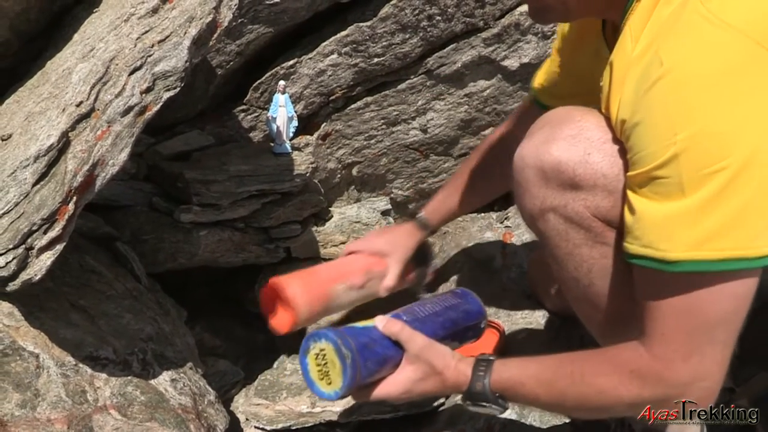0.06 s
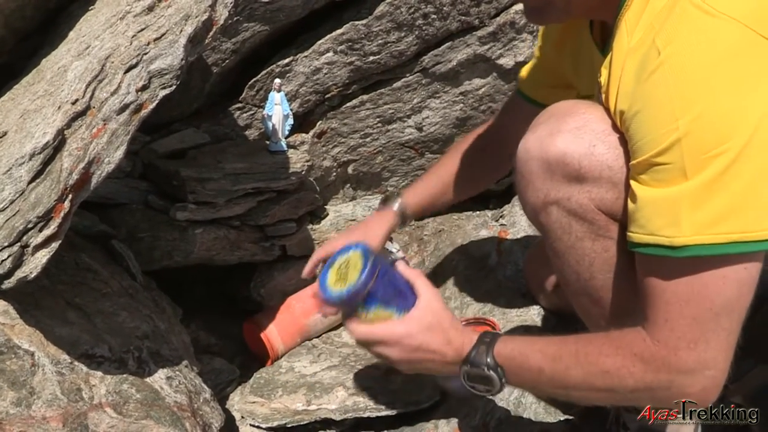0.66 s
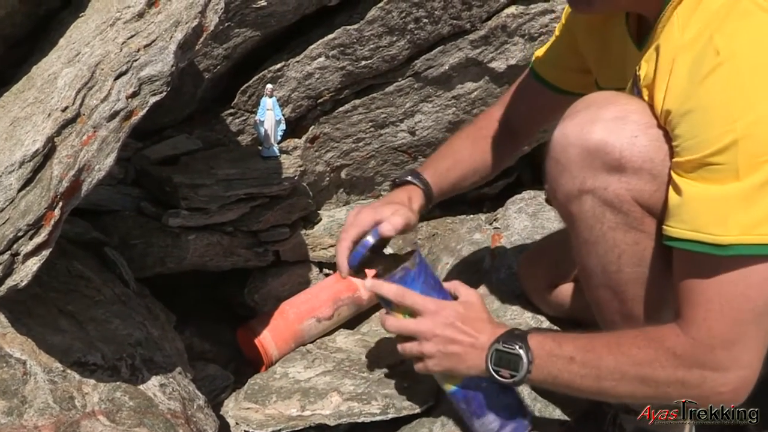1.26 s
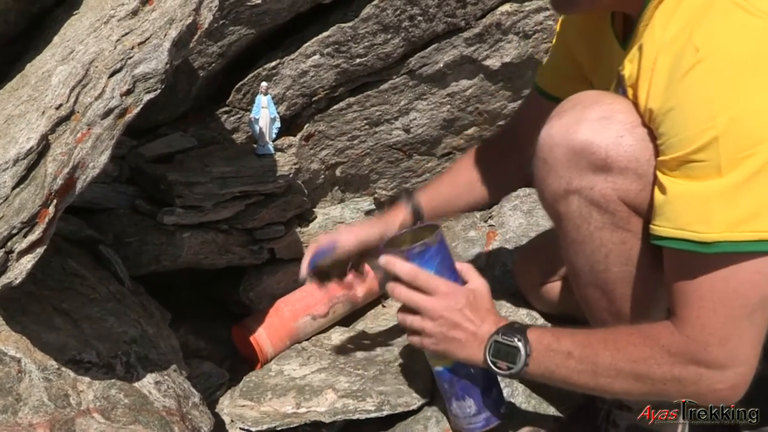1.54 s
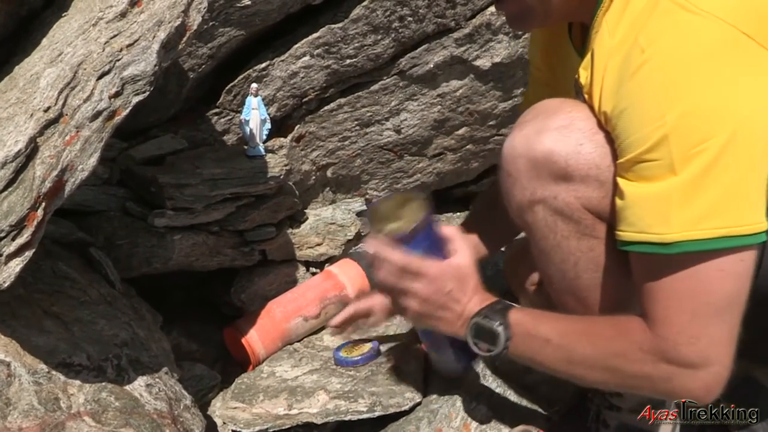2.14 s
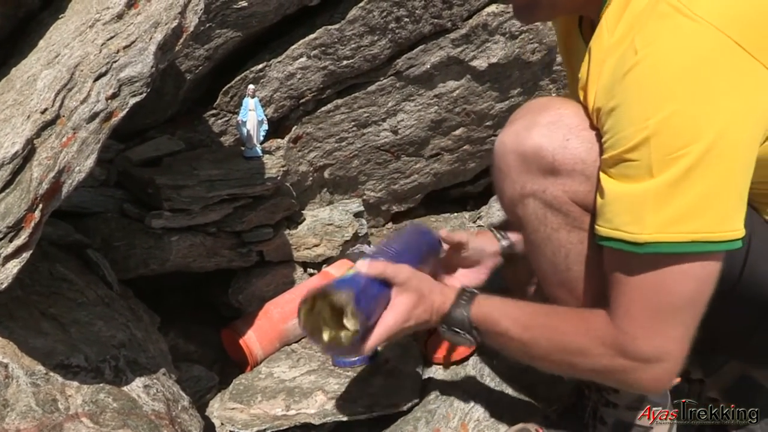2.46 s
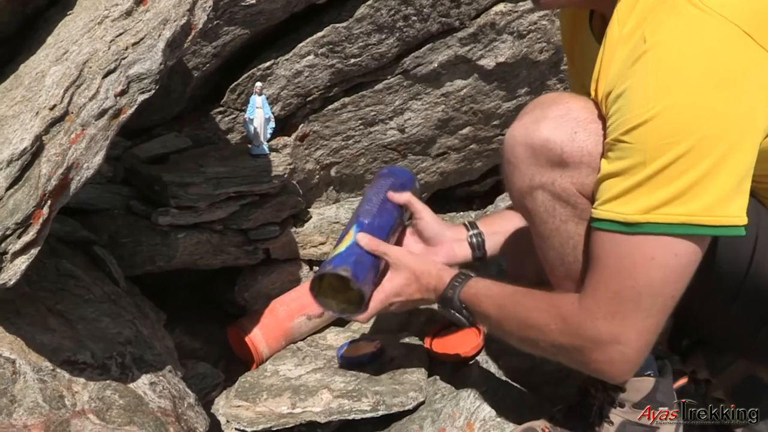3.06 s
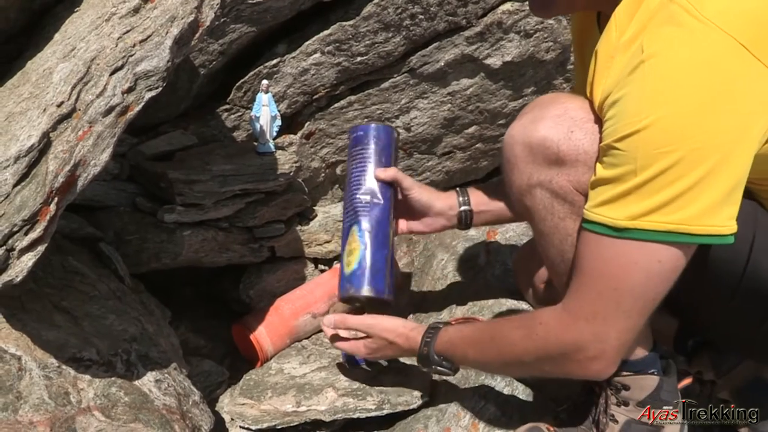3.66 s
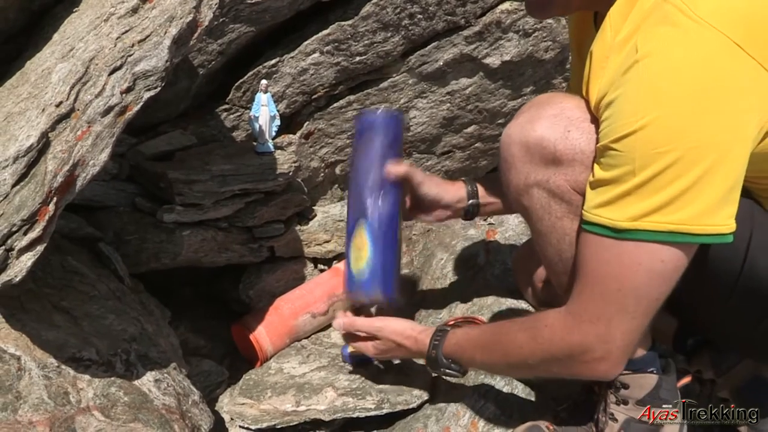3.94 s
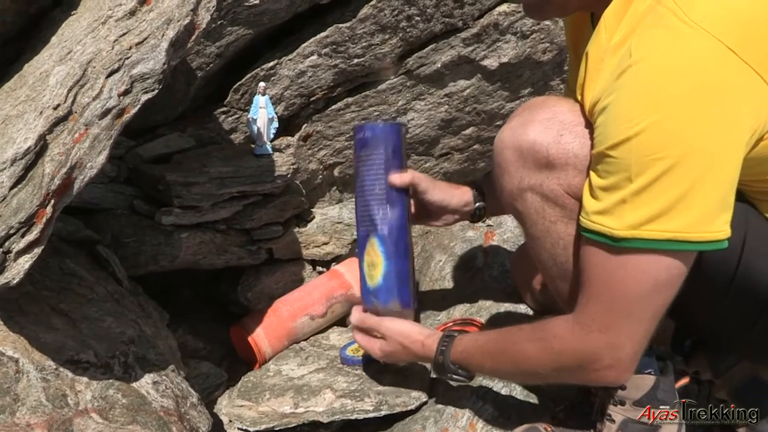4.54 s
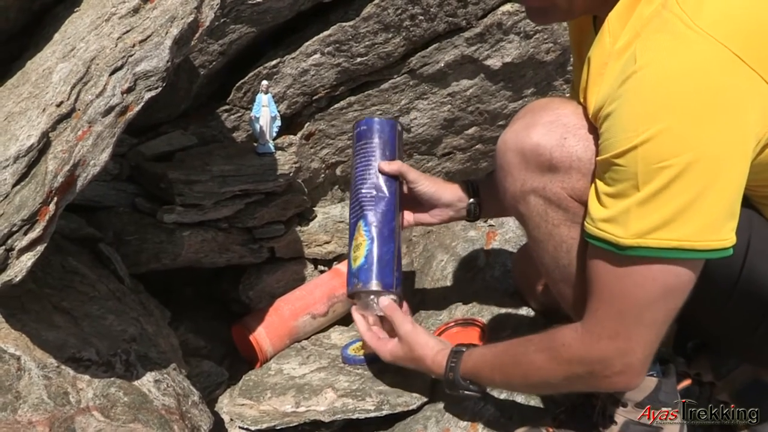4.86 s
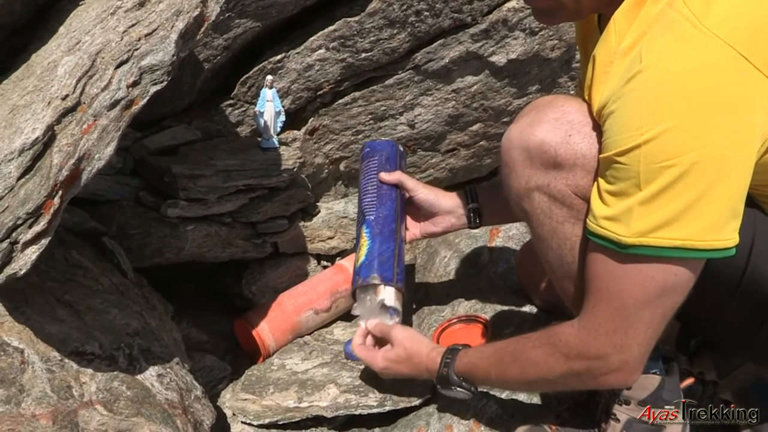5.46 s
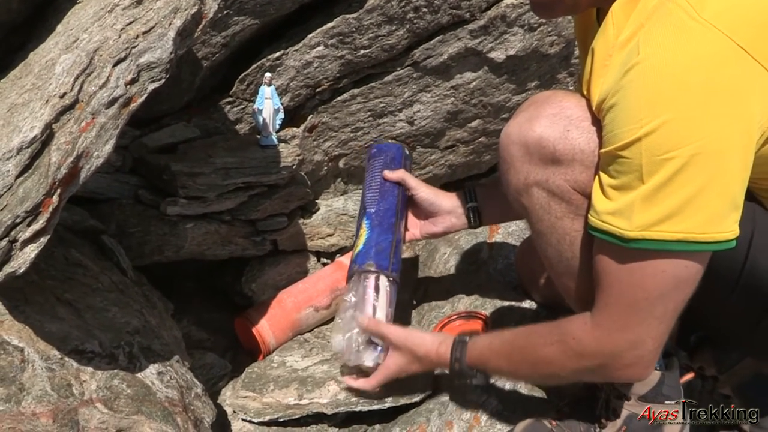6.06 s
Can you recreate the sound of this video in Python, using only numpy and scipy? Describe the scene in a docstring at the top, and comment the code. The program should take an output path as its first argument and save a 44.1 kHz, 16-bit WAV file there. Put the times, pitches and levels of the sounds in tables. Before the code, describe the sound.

A hollow plastic clack, a tin tube clanging and a metal lid dropping, then plastic scraping and ticking out of the tube in light wind.

```python
"""In a quiet rocky niche a man lays down a plastic flask with a hollow clack. His palms brush over things
and light gusts start to buffet the microphone. He scrapes the lid off a tin tube, stands the tube on the
rock with a clang and drops the ringing metal lid. Then he eases a plastic container out of the tube:
it catches, slips, scrapes and ticks. Throughout, a noise suppressor mutes whatever is faint."""
import sys
import numpy as np
from scipy import signal
from scipy.fft import irfft, next_fast_len
from scipy.io import wavfile
from scipy.ndimage import uniform_filter1d

SR = 44100
rng = np.random.default_rng(int(sys.argv[2]) if len(sys.argv) > 2 else 0)


def dump(signal):
    """Clip the signal to [-1, 1] and save it as 16-bit WAV at the path in sys.argv[1]."""
    limited = np.clip(np.atleast_2d(signal).T, -1, 1)
    pcm = np.round(limited * 32767).astype(np.int16)
    wavfile.write(sys.argv[1], SR, pcm)


N = 277915
TOP_HZ = 16100

# The tin tube's modes. Each row: pitch in Hz, level in dB, time to fall 60 dB in seconds.
TIN_MODES = [(271, 2, .19), (392, -5, .28), (417, -6, .22), (631, -5, .17), (762, -3, .14), (797, -9, .33),
             (913, -11, .15), (1032, -5, .19), (1257, -10, .14), (1366, 2, .17), (1690, -29, .45),
             (2003, -14, .2), (2670, -9, .11), (4635, -19, .11)]
# The tone of a rubbed wall. Each row: frequency in Hz, level in dB.
WALL_TONE = [(120, -25), (270, -4), (540, -15.5), (720, -0.5), (1050, -9), (3100, -3), (5300, -4),
             (8200, -12.5), (16000, -17)]
# Pulls that ease the container along. Each row: start and length in seconds, level in dB,
# swell from start to end in dB, tilt in dB per octave.
PULLS = [(3.764, 0.098, -49, -7.5, -5), (3.909, 0.12, -46.5, -13.5, -2), (4.04, 0.053, -36.5, 15.5, -2.5),
         (4.11, .21, -42, 7.5, -3.5), (4.313, 0.233, -35.5, 2, -2.5), (4.539, 0.13, -42.5, -13.5, -2.5),
         (4.734, 0.16, -45.5, 3, -5.5), (4.982, 0.16, -38.5, -5.5, -0.5), (5.123, 0.103, -26, 4.5, 1),
         (5.223, 0.334, -40, 17.5, -1.5), (5.599, 0.073, -25, -1.5, -1.5), (5.69, 0.081, -38.5, -19.5, -2),
         (5.77, 0.155, -36, 5.5, -2), (5.933, 0.093, -43.5, 1, -1.5), (6.08, 0.14, -51.5, 4, -2),
         (6.227, .076, -42, -13, -0.5)]


def amp(db):
    """Decibels to gain."""
    return 10 ** (np.asarray(db) / 20)


def unit(x):
    """Scales to rms 1."""
    return x / np.sqrt(np.mean(x ** 2) + 1e-20)


def read(points, hz):
    """Reads a table along a log-frequency axis."""
    f, value = np.transpose(points)
    return np.interp(np.log(hz + 1), np.log(f + 1), value)


def add(mix, s, sound):
    """Mixes a sound in at s seconds."""
    part = mix[round(s * SR):][:len(sound)]
    part += sound[:len(part)]


def swell(t, rise, length, fall):
    """A soft rise, a hold until `length`, an exponential fall."""
    return np.sin(np.pi / 2 * np.minimum(t / rise, 1)) ** 2 * np.exp(-np.maximum(t - length, 0) / fall)


def shaped(x, envelope):
    """Lays an envelope on a sound, which then has the envelope's power."""
    return unit(x * envelope) * np.sqrt(np.mean(envelope ** 2))


def spectra(x, size):
    """Short-time spectra: frequencies, times, bins."""
    return signal.stft(x, SR, nperseg=size, noverlap=size * 3 // 4)


def waveform(z, size):
    """Back from short-time spectra."""
    return signal.istft(z, SR, nperseg=size, noverlap=size * 3 // 4)[1]


def colour(x, tone, tilt=0, modes=()):
    """EQ that keeps white noise's power: a tone curve, a tilt about 2 kHz, peaks (Hz, width Hz, dB)."""
    hz = abs(np.fft.fftfreq(4096, 1 / SR))
    db = read(tone, hz) + tilt * np.log2(np.maximum(hz, 250) / 2000)
    for centre, width, lift in modes:
        db = db + lift / (1 + (2 * (hz - centre) / width) ** 2)
    minimum_phase = np.exp(np.conj(signal.hilbert(np.log(amp(db)))))
    taps = np.fft.ifft(minimum_phase).real
    return signal.oaconvolve(x, taps / np.linalg.norm(taps))[:len(x)]


def shimmer(n, hz):
    """The many weak modes of a thin shell; each blow sets them off with other strengths."""
    lines = np.zeros(n, complex)
    real, imaginary = rng.standard_normal((2, n))[:, :len(hz)]
    lines[np.round(hz * n / SR).astype(int)] = real + 1j * imaginary
    return unit(irfft(lines, n))


def strikes(blows, modes, tone, fade, spacing_hz, grit=0.94, grit_s=0.0041):
    """Blows ring a shell's modes; a gritty clatter holds while it chatters, then dies band by band."""
    # Each blow: start in seconds, clatter and ring in dB, chatter in seconds, tilt in dB per octave.
    # Each mode: pitch in Hz, level in dB, time to fall 60 dB in seconds.
    # Tone rows pair Hz with a level in dB; fade rows pair Hz with seconds to fall 60 dB.
    out, t = np.zeros(N), np.arange(SR // 2) / SR
    slots = np.arange(1, TOP_HZ // spacing_hz)
    weak_hz = (slots + rng.random(N)[:len(slots)]) * spacing_hz
    for s, clatter_db, ring_db, chatter, tilt in blows:
        scrape = grit * rng.standard_normal(len(t)) * np.exp(-np.maximum(t - chatter, 0) / grit_s)
        dense = unit(colour(shimmer(len(t), weak_hz) + scrape, tone, tilt))
        hz, age, bins = signal.stft(dense, SR, nperseg=128)
        decay = amp(-60 * np.maximum(age - chatter, 0) / read(fade, hz)[:, None])
        clatter = signal.istft(bins * decay, SR)[1][:len(t)]
        ring = np.zeros(len(t))
        for k, (f, db, t60) in enumerate(modes):
            dull_db = min(tilt, 0) * np.log2(f / modes[0][0])  # soft blows barely ring the high modes
            ring += (-1) ** k * amp(db + dull_db - 60 * t / t60) * np.sin(2 * np.pi * f * t)
        add(out, s, amp(clatter_db) * clatter + amp(ring_db) * ring * (1 - np.exp(-t / 0.004)))
    return out


def flask_clack():
    """The plastic flask knocks on the rock: a dry clack over a hollow ring."""
    # Its knocks, its modes, and the clack's tone and decay; rows as in strikes().
    blows = [(.382, -28, -22, 0.003, -14.5), (.419, -12, -20, 0.0042, 3), (.443, -46, -40, 0.014, 6),
             (.644, -37.5, -37, 0.018, -7)]
    modes = [(208.8, 2, 0.23), (483, -3, 0.12), (920, -17, .05), (2150, -20.5, 0.27)]
    tone = [(150, -23.5), (700, -5.5), (960, 9.5), (1250, -13), (1800, -6), (3800, -13.5), (5400, -20),
            (8000, -40.5), (16000, -68.5)]
    fade = [(300, 0.065), (12000, 0.028)]
    return strikes(blows, modes, tone, fade, spacing_hz=45)


def wander(x, depth_db=4):
    """The contact point moves, so ever different regions of the spectrum speak."""
    bins = spectra(x, size=256)[2]
    db = 0
    for bands, frames in (2, 9), (28, 4):  # narrow slow patches, then broad quick ones
        patches = uniform_filter1d(rng.standard_normal(bins.shape), size=bands, axis=0)
        db += depth_db * np.tanh(unit(uniform_filter1d(patches, size=frames, axis=1)))
    return unit(waveform(bins * amp(db), size=256)[:len(x)])


def shell(x, ring_db=-6, ring_s=0.011):
    """Each slip is heard dry and then rings briefly in the crowded modes of the wall."""
    t = np.arange(SR // 16) / SR
    tail = rng.standard_normal(len(t)) * np.exp(-t / ring_s)
    taps = (t == 0) + amp(ring_db) * tail / np.linalg.norm(tail)
    return signal.oaconvolve(x, taps / np.linalg.norm(taps))[:len(x)]


def palms(width_hz=70, lift_db=11):
    """Soft scratchy swells of skin on flask and tube, coloured by the tube's upper modes."""
    # Each row: midpoint in seconds, level in dB, length in seconds, tilt in dB per octave.
    brushes = [(0.396, -37, 0.077, -7), (0.573, -54.5, 0.13, -1.5), (0.807, -57.5, .13, -2),
               (0.924, -55.5, 0.11, 0), (1.05, -60.5, 0.13, 1), (2.793, -52.5, 0.099, -0.5),
               (2.918, -63.5, 0.32, -5), (3.006, -38.5, 0.055, -5.5), (3.15, -60, 0.15, 4),
               (3.685, -48.5, 0.1, -1.5)]
    modes = [(hz, width_hz, lift_db) for hz, _, _ in TIN_MODES if hz > 1000]
    out = np.zeros(N)
    for s, db, length, tilt in brushes:
        n = int(length * SR)
        skin = shell(wander(rng.standard_normal(SR // 2)))[-n:]
        add(out, s - length / 2, amp(db) * colour(skin, WALL_TONE, tilt, modes) * np.hanning(n))
    return out


def gusts(rise_s=0.033, fall_s=0.027, lull_db=-65.5):
    """Force of the wind and of its eddies: each gust builds, blows and dies quickly over a faint lull."""
    # Each row: start and length in seconds, level in dB, fine eddies in dB relative to the gust.
    puffs = [(0.529, 0.15, -42, -14.5), (0.724, 0.21, -42, -13), (1.0, 0.098, -39.5, -7.5),
             (1.146, 0.08, -46.5, -6), (1.736, 0.21, -47.5, -29), (2.588, 0.16, -38.5, -5.5),
             (2.839, 0.05, -46.5, -9.5), (3.043, 0.074, -34, -6), (3.174, 0.034, -36, -3.5),
             (3.25, 0.18, -41, -16), (4.194, 0.15, -36, 10.5), (4.339, 0.3, -40, 4.5),
             (4.663, 0.31, -37, -12), (4.807, 0.043, -34, 7), (5.304, 0.41, -44, -0.5),
             (5.911, 0.1, -30, -5), (6.037, 0.3, -41, -3)]
    power, eddy_power = np.full(N, amp(lull_db) ** 2), np.zeros(N)
    for s, length, db, eddies_db in puffs:
        t = np.arange(int((length + 10 * fall_s) * SR)) / SR
        force = swell(t, rise_s, length, fall_s) * amp(db)
        add(power, s, force ** 2)
        add(eddy_power, s, (force * amp(eddies_db)) ** 2)
    return np.sqrt(power), np.sqrt(eddy_power)


def wind(trim_db=-1, apart=0.5, eddy_peak=(380, 380, 25)):
    """Lumpy low turbulence, partly different at the microphone's two ports; gusts shed finer eddies."""
    # The rumble's tone. Each row: frequency in Hz, level in dB.
    buffet = [(15, -27), (45, 2), (110, 6.5), (200, 0), (350, -21.5), (800, -39)]
    common, side = rng.standard_normal((2, N))
    lumps = unit(uniform_filter1d(uniform_filter1d(rng.standard_normal(N), size=1200), size=800))
    force, eddies = gusts()
    eddies = eddies * amp(3 * lumps[::-1])  # eddies arrive in buffets of their own
    ports = [force * colour(flow, buffet) + eddies * colour(flow[::-1], buffet, modes=[eddy_peak])
             for flow in (common + apart * side, common - apart * side)]
    return signal.lfilter(*signal.butter(4, 1300, fs=SR), ports) * amp(trim_db + 2 * lumps)


def lid_scrape():
    """The lid drags off the rim: friction rings it, shifting in level and brightness along the stroke."""
    # The stroke. Each row: time in seconds, level in dB, tilt in dB per octave.
    stroke = [(1.165, -64, 1.5), (1.186, -33.5, -5), (1.21, -31, 0), (1.224, -23.5, -2), (1.243, -51, -0.5),
              (1.279, -33, 5), (1.305, -55, 1.5), (1.345, -63, 1)]
    # The rim's tone. Each row: frequency in Hz, level in dB.
    rim_tone = [(200, -16.5), (600, -4.5), (2200, -6), (5500, -16), (16000, -38.5)]
    # The scraping lid's resonances. Each row: centre and width in Hz, lift in dB.
    resonances = [(616, 56, 13), (1250, 70, 8.5), (2130, 150, 10.5)]
    out, t = np.zeros(N), np.arange(N) / SR
    times, levels, tilts = np.transpose(stroke)
    db, tilt = np.interp(t, times, levels), np.interp(t, times, tilts)
    grains = shell(wander(rng.standard_normal(N)))
    for step in range(-6, 7, 2):  # crossfade between dull and bright versions
        share = np.maximum(1 - abs(tilt - step) / 2, 0)
        out += share * colour(grains, rim_tone, step, resonances)
    return shaped(out, amp(db) * (t > times[0]) * (t < times[-1]))


def tube_clang():
    """The tin tube is stood on the rock and clangs in a quick run of blows."""
    # Its blows, and the clang's tone and decay; rows as in strikes().
    blows = [(1.433, -45, -45, 0.011, 0), (1.4805, -15, -12.5, .008, -1.5), (1.499, -21, -28, 0.022, -0.82),
             (1.520, -25, -29, .006, 1.5), (1.536, -20.5, -18, 0.012, 2)]
    tone = [(100, -37), (260, -5.5), (520, -8), (950, -4.5), (1400, -12), (1650, -20), (5400, -25),
            (7000, -35.5), (16000, -43)]
    fade = [(300, 0.24), (12000, 0.14)]
    return strikes(blows, TIN_MODES, tone, fade, spacing_hz=30)


def lid_drop():
    """The metal lid hits the rock, bounces and rings brightly."""
    # Its bounces, its modes, and the clatter's tone and decay; rows as in strikes().
    blows = [(1.9497, -13.5, -21, 0.00318, 0), (1.960, -18, -28, .01, 0), (1.976, -20, -23, 0.009, -3),
             (2.096, -47, -38.5, 0.025, -11)]
    modes = [(1150, -3, .08), (1535, 3, .075), (1944, 5, .09), (2147, 1.5, .09), (2554, -6, .1),
             (2703, -1.5, .1), (2805, 1.5, .14), (3183, -2, .16), (3291, -1, .18), (3787, -2, .21),
             (3867, -13, .38), (4266, 2, .22), (4585, -4.5, .14), (5015, -5.5, .13), (5249, -10, .27),
             (5916, -17, .24), (6378, -7, .26), (7650, -16, .2), (8436, -17, .16)]
    tone = [(300, -47), (700, -20.5), (1150, 4), (2000, -1.5), (4400, -7), (6400, -18.5), (11700, -33),
            (16000, -27)]
    fade = [(800, 0.023), (6000, 0.2), (14000, 0.1)]
    return strikes(blows, modes, tone, fade, spacing_hz=170)


def wall_mode(hz=1264, width_hz=160, lift_db=8.5, grip_octaves=0.064):
    """The plastic wall's main resonance, a little detuned by each new grip."""
    return [(hz * 2 ** (grip_octaves * rng.uniform(-1, 1)), width_hz, lift_db)]


def slips(rise_s=0.002, relative_width=0.77, lift_db=14):
    """The container sticks, then lets go in a short dense scrape."""
    # Each row: start in seconds, level in dB, length in seconds, resonance of the touched spot in Hz,
    # tilt in dB per octave.
    catches = [(3.627, -34.5, 0.0061, 1600, -4.5), (3.928, -32.5, 0.009, 1840, -1),
               (4.09, -28.5, 0.0052, 1510, 3), (4.2, -23.5, 0.012, 1900, 3), (4.335, -25, 0.012, 1980, 3),
               (4.461, -22.5, 0.01, 1550, 0.5), (4.723, -30, 0.0081, 1900, -2.5),
               (4.881, -28, 0.0079, 2920, 6), (5.141, -27.5, 0.019, 3570, 1), (5.196, -25, 0.022, 1530, -2),
               (5.591, -26, 0.0091, 3430, 2), (5.613, -22, 0.0093, 3100, 2.5),
               (5.686, -16.5, 0.007, 1080, 0), (5.801, -21.5, 0.0038, 2070, -8)]
    out, t = np.zeros(N), np.arange(SR // 8) / SR
    for s, db, length, hz, tilt in catches:
        envelope = (1 - np.exp(-t / rise_s)) * np.exp(-(t / length) ** 2 / 2)
        burst = rng.standard_normal(len(t)) * envelope
        scrape = colour(burst, WALL_TONE, tilt, wall_mode() + [(hz, relative_width * hz, lift_db)])
        add(out, s, amp(db) * unit(scrape) * np.sqrt(np.mean(envelope ** 2)))
    return out


def friction(n, slips_per_s=1800, spread_db=3.5, snags_per_s=95, snag_db=10.5, relax_s=0.0018):
    """Dense tiny slips over a smooth hiss, under uneven pressure; snags shed a short, crisp crackle."""
    sizes = amp(spread_db * np.minimum(rng.exponential(1, n), 3)) * rng.choice([-1, 1], n)
    tiny_slips = unit(sizes * (rng.random(n) < slips_per_s / SR))
    grains = wander(tiny_slips + 0.5 * rng.standard_normal(n))
    snags = amp(snag_db) * rng.random(n) * (rng.random(n) < snags_per_s / SR)
    snag_power = signal.lfilter([1], [1, -np.exp(-1 / (relax_s * SR))], snags ** 2)
    crisp = signal.lfilter(*signal.butter(2, 1100, "high", fs=SR), grains[::-1])
    pressure = amp(2 * unit(uniform_filter1d(rng.standard_normal(n), size=700)))
    return unit(grains * pressure + crisp * np.sqrt(snag_power))


def slide(attack_s=0.024, release_s=0.0099):
    """Each pull takes hold, swells or slackens evenly and lets go; friction rings the plastic wall."""
    out, t = np.zeros(N), np.arange(SR // 2) / SR
    for s, length, db, swell_db, tilt in PULLS:
        ramp_db = swell_db * (np.minimum(t / length, 1) - 0.5)
        effort = swell(t, attack_s, length, release_s) * amp(db + ramp_db)
        scrape = colour(shell(friction(len(t))), WALL_TONE, tilt, wall_mode())
        add(out, s, shaped(scrape, effort))
    return out


def rustle(level_db=-59, tilt=-0.77):
    """From the first pull on, the container never quite stops rubbing in the tube."""
    moving = np.arange(N) / SR > PULLS[0][0]
    return amp(level_db) * unit(colour(shell(friction(N)), WALL_TONE, tilt, wall_mode())) * moving


def ticks(boost_db=7, tail_db=-19, tail_s=0.0055, relative_width=0.5, lift_db=9):
    """Single sharp snaps of the plastic wall with a few milliseconds of ring."""
    # Each row: start in seconds, relative level in dB, resonance in Hz.
    snaps = [(4.008, -26.5, 5270), (4.3668, -18.5, 5400), (4.832, -20, 5650), (4.938, -24, 3620),
             (4.965, -17.5, 3550), (5.008, -17.5, 3900), (5.0241, -14.5, 4370), (5.067, -14.5, 3160),
             (5.11, -16, 2770), (5.1402, -14.5, 2620), (5.2716, -20.5, 2000), (5.799, -9.5, 2320),
             (6.2766, -24, 3070), (6.2908, -19.5, 2960)]
    out, t = np.zeros(N), np.arange(SR // 20) / SR
    for s, db, hz in snaps:
        snap = (t == 0) + amp(tail_db) * rng.standard_normal(len(t)) * np.exp(-t / tail_s)
        tick = colour(snap, WALL_TONE, modes=[(hz, relative_width * hz, lift_db)])
        add(out, s, amp(db + boost_db) * tick)
    return out


def niche(x, side_db=-11.5, scatter_s=0.0022, left_db=-0.02, lead=0.21):
    """The near rock faces scatter the sound a little differently to each side; there is no long echo."""
    t = np.arange(SR // 50) / SR
    taps = rng.standard_normal(len(t)) * t * np.exp(-t / scatter_s)
    side = amp(side_db) * signal.oaconvolve(x, taps / np.linalg.norm(taps))[:N]
    # The sound reaches the left port slightly first.
    quadrature = signal.hilbert(x, next_fast_len(N))[:N].imag
    side -= lead * signal.lfilter(*signal.butter(1, 4000, fs=SR), quadrature)
    return np.array([amp(left_db) * x + side, amp(-left_db) * x - side])


def suppress(x):
    """A noise suppressor turns down every faint bin, alike in both channels."""
    # Each row: frequency in Hz, level in dB under which the sound fades away.
    threshold = [(100, -68.5), (1000, -78.5), (14000, -93)]
    hz, _, bins = spectra(x, size=1024)
    power = (abs(bins) ** 2).mean(0)
    gain = power / (power + amp(read(threshold, hz))[:, None] ** 2)
    return waveform(bins * gain, size=1024)[:, :N]


def scene():
    """Flask, tube and lid, then the sliding container, among the rocks and in the wind."""
    flask, tube, lid = flask_clack(), tube_clang(), lid_drop()
    container = slide() + rustle() + slips() + ticks()
    hands = lid_scrape() + palms()
    return niche(flask) + niche(tube) + niche(lid) + niche(container + hands) + wind()


def record(dry):
    """The camera's noise suppressor and band limit."""
    lowpass = signal.firwin(511, TOP_HZ, window=("kaiser", 9), fs=SR)
    return signal.oaconvolve(suppress(dry), lowpass[None], "same")


dry = scene()
out = record(dry)
dump(out)
```